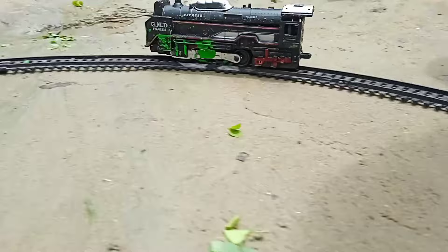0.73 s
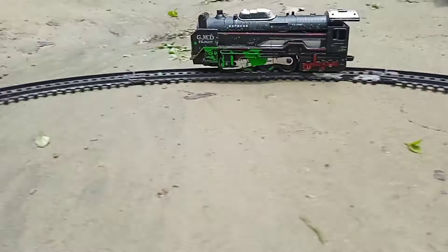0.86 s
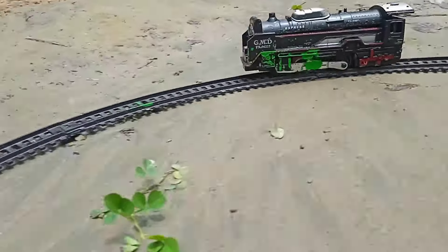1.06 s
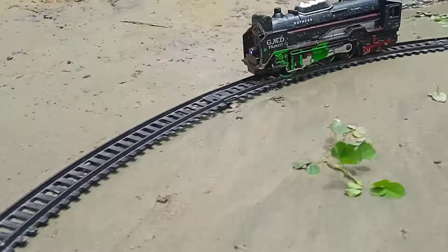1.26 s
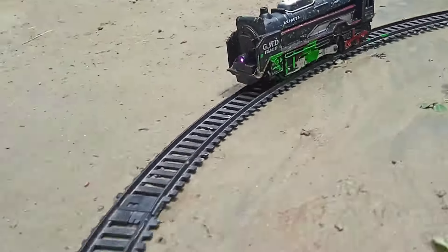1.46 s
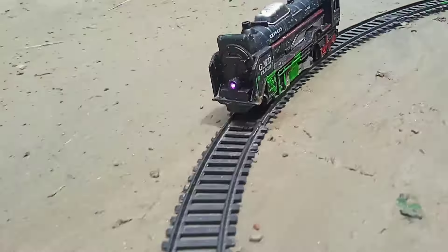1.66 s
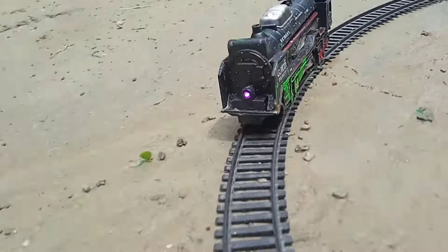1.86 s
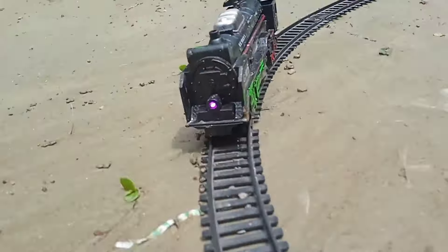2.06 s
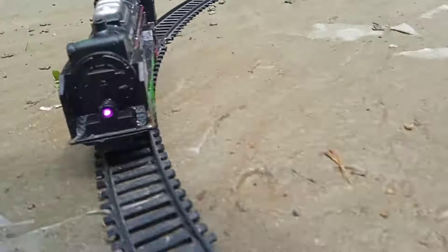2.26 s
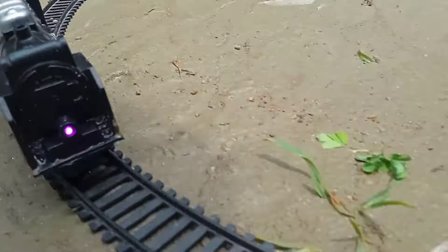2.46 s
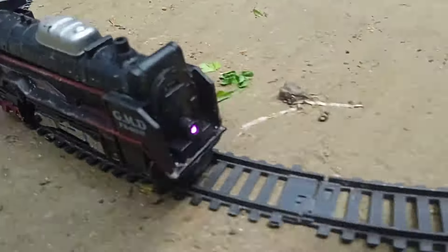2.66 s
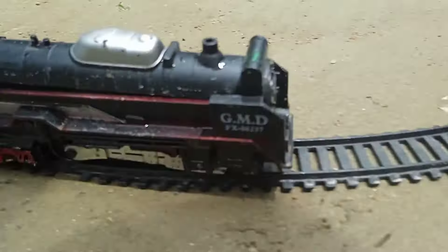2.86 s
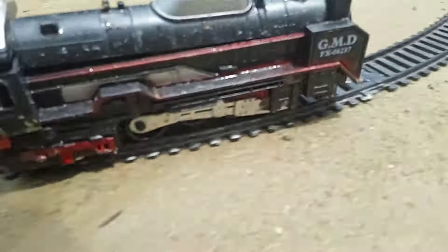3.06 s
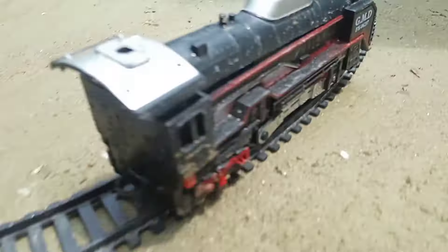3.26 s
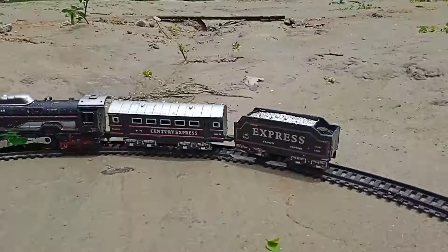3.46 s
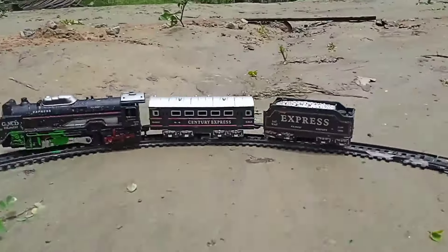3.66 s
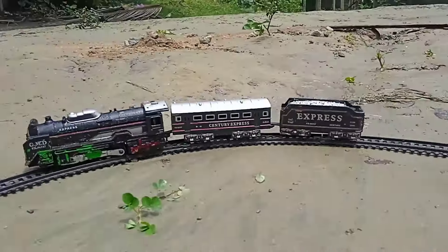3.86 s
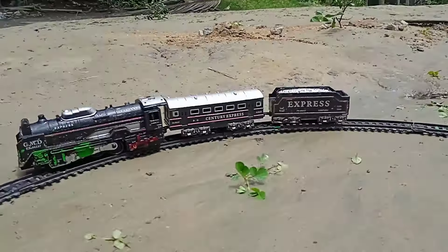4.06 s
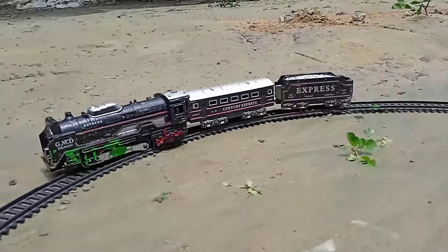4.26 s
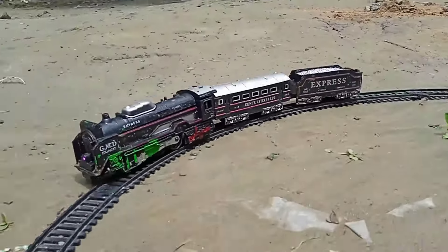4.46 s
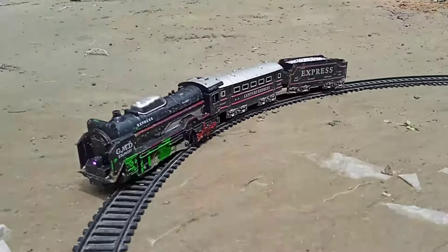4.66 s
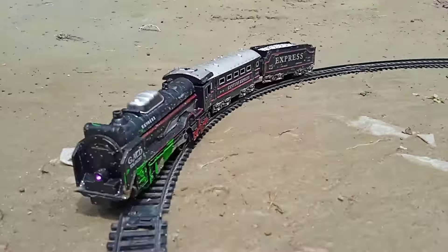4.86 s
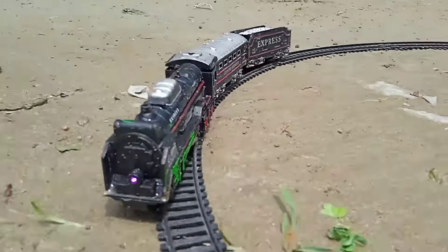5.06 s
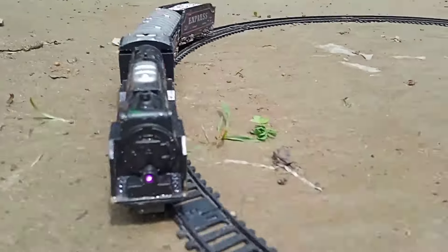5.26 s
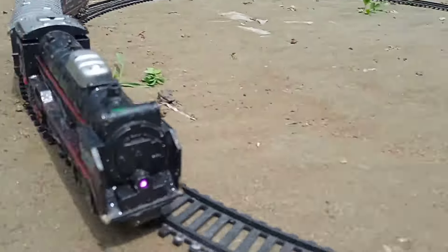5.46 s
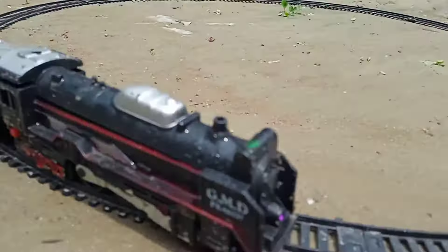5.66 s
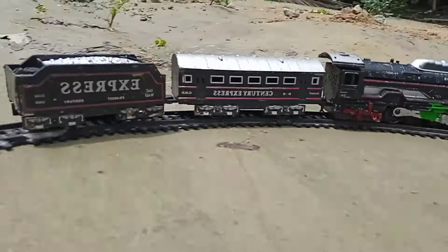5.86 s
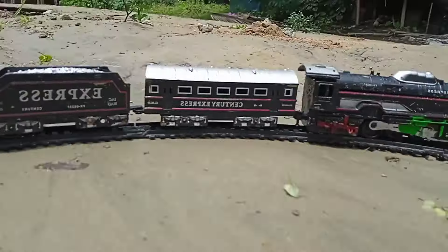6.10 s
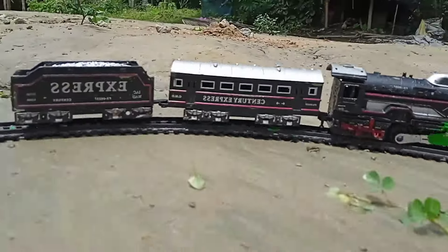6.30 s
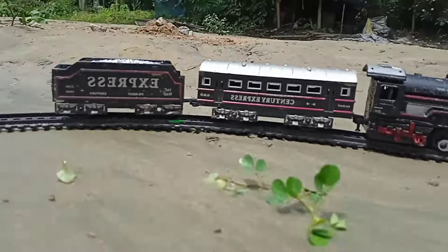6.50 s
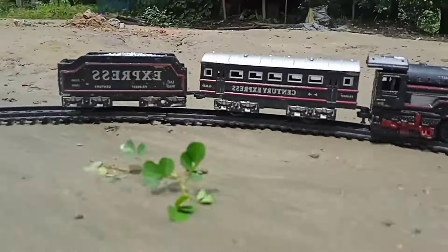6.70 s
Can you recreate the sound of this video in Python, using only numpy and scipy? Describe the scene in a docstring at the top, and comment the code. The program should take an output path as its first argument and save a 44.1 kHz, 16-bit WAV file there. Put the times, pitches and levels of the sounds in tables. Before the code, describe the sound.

A battery toy train rattles and clacks around plastic track outdoors, bright loose gears over faint motor hum, dipping midway, fading out then partly returning.

```python
"""A battery toy train circles on plastic track outdoors, twice passing close to the microphone.
Its loose 12:1 gears knock at random and the wheel rods clack; bursts of noise make both sounds,
and the hollow plastic body colours them. The motor hums in three sine tones, and bumps of the track
on the ground give low thuds. Near the end the sound fades almost to silence and partly comes back."""
import sys
import numpy as np
from scipy import signal
from scipy.io import wavfile
from scipy.ndimage import uniform_filter1d, minimum_filter1d

SR = 44100
rng = np.random.default_rng(int(sys.argv[2]) if len(sys.argv) > 2 else 0)


def wrap_up_sound(samples):
    """Save the sound to the file named by the first command line argument, as 16-bit audio."""
    columns = np.atleast_2d(samples).T
    # keep every value between -1 and 1, then stretch to whole-number steps
    tamed = np.clip(columns, -1, 1)
    steps = np.round(tamed * 32767).astype(np.int16)
    wavfile.write(sys.argv[1], SR, steps)


N = 345744
TIME = np.arange(N) / SR

# speed of the motor shaft: (time [s], speed [turns per s])
MOTOR_SPEED = [(0.0, 171.77), (0.5, 172.05), (1.0, 171.36), (1.45, 170.12), (1.9, 171.85), (2.25, 172.43),
               (2.7, 171.19), (3.2, 172.75), (3.6, 171.03), (3.95, 172.65), (4.6, 171.61), (5.2, 169.09),
               (5.7, 170.34), (6.3, 170.29), (7.0, 170.9), (7.84, 170.53)]
# how hard the gears knock through one wheel turn, before scaling: (share of turn [0-1], force [dB])
WHEEL_STROKE = [(0, 6), (.1, 4.5), (.22, 4), (.27, 9), (.32, 4.5), (.36, 9.5), (.43, 6), (.48, 6),
                (.57, -3), (.68, 4.5), (.8, 3.5), (.9, 5), (1, -7.5)]
# a single shift of the rhythm between the passes: (time [s], delay [wheel turns])
RHYTHM_SHIFT = [(3.55, 0), (3.75, .165)]
# nearness of the train, and the amounts of three tone colours as it moves:
# (time [s], rattle level [dB], colour 1 [about -1 to 1], colour 2 [about -1 to 1], colour 3 [about -1 to 1])
TRAIN_PASSING = [(0.0, -29.5, -0.38, -0.39, 0.23), (0.25, -29, -0.27, -0.08, 0.49),
                 (0.6, -26, 0.068, -1.15, -0.28), (1.15, -27.5, 0.0016, -1.1, 0.11),
                 (1.42, -28, 0.18, -0.92, -0.67), (1.9, -27, -0.045, -1.03, 0.013),
                 (2.45, -28.5, -0.12, -0.23, 0.66), (2.9, -28.5, -0.17, -0.057, 0.62),
                 (3.66, -42.5, -0.25, 0.62, -0.017), (4.3, -33.5, -0.55, -0.26, 0.28),
                 (4.6, -29, 0.11, -0.91, -.2), (4.9, -29.5, 0.036, -0.68, -1.1),
                 (5.35, -31, 0.4, -0.15, -0.94), (5.85, -25.5, 0.91, 1, -0.31),
                 (6.35, -27, -0.16, .2, 0.43), (6.85, -32.5, -0.28, 0.46, 0.03),
                 (7.45, -37, -0.49, 0.18, -0.42), (7.84, -34.5, -0.32, -.7, 0.68)]
# broad response of the plastic shell, under its resonances: (frequency [Hz], relative level [dB])
SHELL_RESPONSE = [(25, -39), (55, -30.5), (120, -20.5), (450, -18), (650, -17.5), (900, -17.5),
                  (1400, -9.5), (4000, -1.5), (7000, -3.5), (9000, -10), (14000, -19), (15750, -5)]
# resonances of the body: (frequency [Hz], width [Hz], relative level [dB],
# change at full colour 1 [dB], at full colour 2 [dB], at full colour 3 [dB])
BODY_MODES = [(1073, 310, 8.5, -3, -1, 3.1), (1721, 650, 9.5, 7.5, -3, 1), (2537, 642, 14, -13, 2.5, 2.5),
              (2960, 88, -4, -7, 0.5, -8), (3420, 580, 6.5, -6, -3.5, 0.5), (4330, 600, 3.5, -8.5, -1, 2),
              (5130, 53, -0.8, -5, -8, 27), (5534, 1060, 6.5, 0.5, 0, 2), (6390, 380, 4.5, -1.5, -1.5, 1.5),
              (6684, 390, 5, -10, 1, -9), (7540, 490, 4, 0, -4, -1), (8130, 174, 11.5, 5, 3.5, 9),
              (12860, 4300, 5.5, -5.5, 0.5, 0), (14900, 1100, 4, 6.0, -1, 2.5)]
# play in the gears; a negative spread mirrors the random sizes: (time [s], spread of impact sizes [dB])
GEAR_PLAY = [(0, 2), (2.5, 4), (3.7, 5.5), (4.7, -2.5), (5.3, 1.5), (6.0, 5), (6.4, 6), (7.8, -0.5)]
# knocks of rods and wheels in every wheel turn, before snap and random changes:
# (share of turn [0-1], level over the rattle [dB], chatter time [s], chance [0-1])
WHEEL_KNOCKS = [(.075, 8.5, 0.0014, .55), (0.254, 6, 0.0027, .7), (0.349, 11, 0.0061, 1),
                (.465, 8.5, 0.005, .75), (.68, 7, 0.0024, .35), (0.739, 8, 0.0028, .35),
                (0.828, 7.5, 0.0064, .55), (0.927, 11, 0.0035, .45)]
# the hardest clacks, before the cut shared by all clacks: (time [s], level [dB], chatter time [s])
HARD_CLACKS = [(0.025, -14.5, 0.005), (0.1, -15.5, 0.0078), (0.1625, -15.5, 0.013), (0.304, -16, 0.012),
               (0.373, -13.5, 0.0043), (0.5813, -9, 0.0031), (0.6524, -10, 0.0028), (1.004, -14, 0.0019),
               (1.122, -14.5, .0025), (1.1472, -14, 0.011), (1.2364, -10.5, 0.001), (1.4937, -9, 0.0035),
               (1.8441, -14, 0.0095), (1.916, -15, 0.0098), (2.125, -13, 0.0024), (2.193, -13.5, 0.0033),
               (2.265, -13, 0.008), (2.321, -10.5, 0.0028), (2.341, -9, 0.0018), (2.471, -13.5, 0.0058),
               (2.5504, -14, 0.0024), (2.6839, -14, 0.0042), (2.792, -6, 0.0012), (2.83, -12, 0.0031),
               (3.1234, -11, 0.0014), (3.4528, -25, 0.0047), (3.815, -27.5, 0.0036), (3.8814, -29, 0.002),
               (4.6473, -16.5, 0.0035), (4.93, -14, 0.0037), (4.9996, -11.5, 0.0018), (5.211, -13, .0025),
               (5.2821, -8.5, 0.0017), (5.7765, -8, 0.003), (5.898, -10, .002), (6.0861, -11.5, 0.0037)]
# on parts of the lap the knocks snap harder and shorter: (time [s], snap [dB])
KNOCK_SNAP = [(0, -4), (1.2, 4), (1.5, 1), (2.4, 0.5), (3.0, -2), (3.7, -2.5), (4.4, -2.5), (4.95, 5),
              (5.8, 3.5), (6.3, -0.5), (7.84, -1)]
# place on the circle of track; whole laps are the far side: (time [s], place [laps])
LAP_PLACE = [(0, 0.2), (1.35, .5), (2.9, 0.73), (3.66, 1), (4.6, 1.21), (5.6, 1.463), (7.15, 1.93),
             (7.84, 2.18)]
# motor hum, one row for each multiple of the shaft speed:
# (level in full beam before wavering [dB], narrowness of beam [exponent], offset of beam [laps])
HUM_TONES = [(-59, 1.54, -0.0078), (-65, 1.83, -0.023), (-55, 3.5, 0.016)]
# dull bumps of the track on the ground: (time [s], level [dB])
TRACK_BUMPS = [(1.001, -57), (1.352, -48), (1.429, -45.5), (1.628, -45), (1.852, -48), (2.679, -39.5),
               (4.71, -48), (4.922, -57), (6.619, -60)]
# the closing fade and return: (time [s], gain [0-1])
CLOSING_FADE = [(7.013, 1), (7.52, .075), (7.556, .008), (7.57, .008), (7.6, .07), (7.84, .5)]

GEAR_RATIO = 12  # motor turns in one wheel turn
KNOCK_SPREAD_DB, KNOCK_JITTER_S, CHATTER_SPREAD_DB = 1.1, .0006, 3
SHORTER_PER_DB = 1.63  # dB less chatter time for each dB of snap
# a knocked part rebounds several times: typical gap, spread of the gaps, ring, and noise left between
BOUNCE_S, BOUNCE_SPREAD_DB, BOUNCE_RING_S, BOUNCE_FLOOR = .0022, 2.5, 0.00091, 0.25
BASS_SHADE_DB, BASS_SHADE_HZ = -3, 450  # the bass of the rattle weakens on the far side
HUM_LEAK = 0.073  # hum that escapes in all directions, before the beam is narrowed
HUM_WAVER_DB = 1.6
PEAK_LIMIT, EDGE_HZ = .36, 15950  # largest sample the limiter allows; top of the treble


def body(turns):
    """The impacts ring the hollow shell; its resonances swell and shrink as the train moves."""
    near_db, *amounts = curves(TRAIN_PASSING)
    knocks = wheel_knocks(turns, near_db)
    impacts = gears(turns) * free_flight(knocks) + rod_clacks(knocks)
    rattle = signal.oaconvolve(impacts, causal(shell_gain()))[:N]
    hz, t, spectrum = signal.stft(rattle, SR, nperseg=512, noverlap=384)
    colour_db = tone_colours_db(hz, t, amounts) + bass_shade_db(hz, t)
    spectrum = spectrum * gain_of(colour_db) * wavering_colour(spectrum.shape)
    heard = signal.istft(spectrum, SR, nperseg=512, noverlap=384)[1][:N]
    return gain_of(near_db) * heard


def gears(turns, teeth_db=-3.5, knocks_db=-3.0, soft_hz=2700, rub_db=-17):
    """Light bright ticks of the teeth, sparse dull knocks of loose shafts, and the smooth rub of axles."""
    tooth_hits = gear_impacts(turns, per_s=900, stroke_depth=0.81, buzz_db=1.0)
    teeth = strike(tooth_hits, ring_s=0.00036, tail_db=-13)
    shaft_hits = gear_impacts(turns, per_s=260, stroke_depth=0.23, buzz_db=1.5)
    knocks = strike(shaft_hits, ring_s=0.00045, tail_db=-25.5)
    knocks = signal.lfilter(*signal.butter(2, soft_hz, fs=SR), knocks)
    rub = rng.standard_normal(N)
    return gain_of(teeth_db) * teeth + gain_of(knocks_db) * knocks + gain_of(rub_db) * rub


def gear_impacts(turns, per_s, stroke_depth, buzz_db):
    """Loose parts knock at random, harder once a motor turn and on the push of the wheel rods."""
    wheel = (turns / GEAR_RATIO - curves(RHYTHM_SHIFT)[0]) % 1
    stroke_db = stroke_depth * np.interp(wheel, *np.transpose(WHEEL_STROKE))
    motor_db = buzz_db * np.cos(2 * np.pi * (turns - .27))
    size = gain_of(curves(GEAR_PLAY)[0] * np.minimum(rng.standard_normal(N), 1.25))
    happens = rng.random(N) < per_s / SR
    hits = size * happens * rng.choice([-1, 1], N)
    # the motor feeds the rattle with steady power
    hits /= np.sqrt(np.abs(uniform_filter1d(hits ** 2, size=2000)) + 1e-9)
    return evened(hits * gain_of(stroke_db + motor_db))


def strike(hits, ring_s, tail_db, count=16):
    """Impacts land on many points of contact, each with a colour of its own."""
    point = rng.integers(0, count, N)
    out = np.zeros(N)
    for k in range(count):
        out += signal.oaconvolve(hits * (point == k), contact(ring_s, tail_db))[:N]
    return out


def contact(ring_s, tail_db, tail_s=0.0093, size=1024):
    """One point of contact: a crack that scatters through the plastic, then a short weak ring."""
    t = np.arange(size) / SR
    dying = np.exp(-t / ring_s) + gain_of(tail_db) * np.exp(-t / tail_s)
    burst = rng.standard_normal(size) * dying
    return burst / np.linalg.norm(burst)


def free_flight(knocks, lull_db=-8.0, flight_s=.006):
    """Just before a clack the parts cross their play without touching, so the rattle thins."""
    starts = np.sort(knocks[:, 0])
    coming = np.minimum(np.searchsorted(starts, TIME), len(starts) - 1)
    ahead_s = np.abs(starts[coming] - TIME)
    return gain_of(lull_db * np.exp(-(ahead_s / flight_s) ** 2))


def wheel_knocks(turns, near_db, same_s=.012):
    """Rods and wheels knock every turn; rows of (s, dB over the rattle, chatter s), hardest clacks included."""
    wheel = turns / GEAR_RATIO - curves(RHYTHM_SHIFT)[0]
    hard = np.array([(s, db - np.interp(s, TIME, near_db), chatter_s) for s, db, chatter_s in HARD_CLACKS])
    count = len(WHEEL_KNOCKS)
    turn, kind = np.divmod(np.arange(int(wheel[-1]) * count), count)
    share, db, chatter_s, chance = np.array(WHEEL_KNOCKS)[kind].T
    late, harder, longer = rng.standard_normal((len(turn), 3)).T
    s = np.interp(turn + share, wheel, TIME) + KNOCK_JITTER_S * late
    snap = np.interp(s, TIME, curves(KNOCK_SNAP)[0])
    level_db = db + snap + KNOCK_SPREAD_DB * harder
    chatter_s = chatter_s * gain_of(CHATTER_SPREAD_DB * longer - SHORTER_PER_DB * snap)
    # a hard clack takes the place of ordinary knocks close to it
    apart = np.abs(s[:, None] - hard[:, 0]).min(1) > same_s
    sounds = (rng.random(len(s)) < chance) & apart
    return np.vstack([hard, np.transpose([s, level_db, chatter_s])[sounds]])


def rod_clacks(knocks, clack_db=-3.0, soft_hz=6000, rise_s=.0003, size=1400):
    """Each clack is a blow that builds, chatters in quick rebounds and dies."""
    power, t = np.zeros(N), np.arange(size) / SR
    for s, db, chatter_s in knocks:
        gaps = BOUNCE_S * gain_of(BOUNCE_SPREAD_DB * rng.standard_normal(16))
        blows = np.append(0, np.cumsum(gaps))
        since_s = t - blows[np.searchsorted(blows, t, "right") - 1]
        rebounds = evened(BOUNCE_FLOOR + np.exp(-since_s / BOUNCE_RING_S))
        dying = np.exp(-(t / max(chatter_s, 1 / SR)) ** 0.8) * (1 - np.exp(-t / rise_s))
        add(power, s, (gain_of(db + clack_db) * dying * rebounds) ** 2)
    hiss = rng.standard_normal(N)
    return signal.lfilter(*signal.butter(1, soft_hz, fs=SR), np.sqrt(power) * hiss)


def shell_gain(size=4096):
    """The shell passes some pitches more strongly: a broad curve with the resonances on top."""
    hz = np.fft.rfftfreq(size, 1 / SR)
    f, db = np.transpose(SHELL_RESPONSE)
    mode_db = np.transpose(BODY_MODES)[2]
    gain = gain_of(np.interp(np.log(hz + 1), np.log(f), db) + mode_db @ mode_shapes(hz))
    # the band from 3 to 7.5 kHz sets the overall level
    return gain / np.sqrt(np.mean(gain ** 2 * ((hz > 3000) & (hz < 7500))))


def mode_shapes(hz):
    """Each resonance is a bell of height 1 around its pitch: modes x frequencies."""
    centre, width = np.transpose(BODY_MODES)[:2, :, None]
    return 1 / (1 + (2 * (hz - centre) / width) ** 2)


def tone_colours_db(hz, t, amounts):
    """Each of three tone colours raises some resonances and lowers others as the train moves."""
    colours = np.transpose(BODY_MODES)[3:]
    shapes = mode_shapes(hz)
    return sum(np.outer(db @ shapes, np.interp(t, TIME, amount)) for db, amount in zip(colours, amounts))


def bass_shade_db(hz, t):
    """The bass of the rattle weakens toward the far side of the lap."""
    far = np.cos(np.pi * np.interp(t, *np.transpose(LAP_PLACE))) ** 2
    return BASS_SHADE_DB * np.outer(1 / (1 + (hz / BASS_SHADE_HZ) ** 2), far)


def wavering_colour(shape, slow_db=1.5, quick_db=1.4):
    """The colour wavers at random: slow narrow patches and quick broad patches of loudness."""
    slow = patches(shape, frames=22, bins=3)
    quick = patches(shape, frames=4, bins=14)
    return evened(gain_of(slow_db * slow + quick_db * quick))


def patches(shape, frames, bins):
    """Smooth random field of rms 1 over frequency and time."""
    field = rng.standard_normal(shape)
    for axis, size in ((0, bins), (1, frames)) * 2:
        field = uniform_filter1d(field, size, axis)
    return evened(field)


def motor_hum(turns):
    """The unbalanced three-pole rotor gives three wavering tones, each beamed at the microphone once a lap."""
    lap, out = curves(LAP_PLACE)[0], np.zeros(N)
    for order, (db, narrowness, offset) in enumerate(HUM_TONES, start=1):
        aim = np.abs(np.sin(np.pi * (lap - offset)))
        beam = (HUM_LEAK + (1 - HUM_LEAK) * aim) ** narrowness
        drift = uniform_filter1d(rng.standard_normal(N), size=4000)
        waver = evened(uniform_filter1d(drift, size=4000))
        tone = np.sqrt(2) * np.sin(2 * np.pi * (order * turns + rng.random()))
        out += gain_of(db + HUM_WAVER_DB * waver) * beam * tone
    return out


def track_bumps(low_hz=55, top_hz=400, rise_s=0.0048, size=4000):
    """The track is pressed onto the soil: soft low thuds of filtered noise."""
    out, u = np.zeros(N), np.arange(size) / SR / rise_s
    dull = signal.butter(2, [low_hz, top_hz], "band", fs=SR, output="sos")
    swell = u * np.exp(1 - u)  # rises to 1, then dies away
    for s, db in TRACK_BUMPS:
        thud = evened(signal.sosfilt(dull, rng.standard_normal(size)))
        add(out, s, gain_of(db) * swell * thud)
    return out


def gain_of(db):
    """Decibels to amplitude."""
    return 10 ** (np.asarray(db) / 20)


def evened(x):
    """Scales to rms 1."""
    return x / np.sqrt(np.mean(x ** 2) + 1e-20)


def curves(rows):
    """Every column of a timed table, at every sample."""
    s, *columns = np.transpose(rows)
    return [np.interp(TIME, s, c) for c in columns]


def add(mix, s, sound):
    """Mixes a sound in at time s."""
    part = mix[max(round(s * SR), 0):][:len(sound)]
    part += sound[:len(part)]


def causal(gain, size=2048):
    """Impulse response that starts at once and has the given gain on the rfft bins."""
    log_gain = np.log(np.maximum(gain, 1e-5))
    circle = np.concatenate([log_gain, log_gain[-2:0:-1]])
    return np.fft.ifft(np.exp(np.conj(signal.hilbert(circle)))).real[:size]


def scene():
    """The train in open air, the same in both channels."""
    turns = np.cumsum(curves(MOTOR_SPEED)[0]) / SR
    train = body(turns) + motor_hum(turns) + track_bumps()
    return np.array([train, train])


def record(dry):
    """A fast limiter holds the sharpest peaks; then come the fade and the upper limit of the treble."""
    allowed = np.minimum(1, PEAK_LIMIT / (np.abs(dry).max(0) + 1e-9))
    held = dry * uniform_filter1d(minimum_filter1d(allowed, size=61), size=41)
    low_pass = signal.firwin(511, EDGE_HZ, window=("kaiser", 9), fs=SR)
    return signal.oaconvolve(held * curves(CLOSING_FADE)[0], low_pass[None], "same")


dry = scene()
out = record(dry)
wrap_up_sound(out)
```